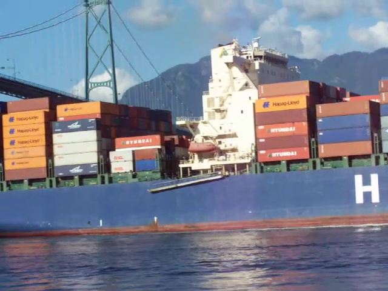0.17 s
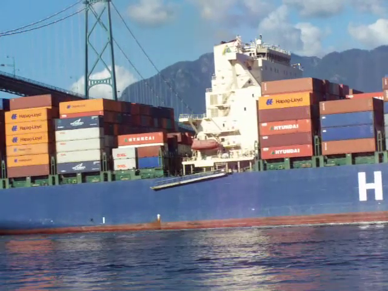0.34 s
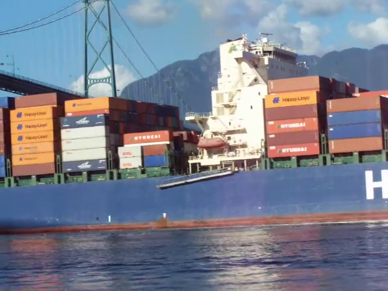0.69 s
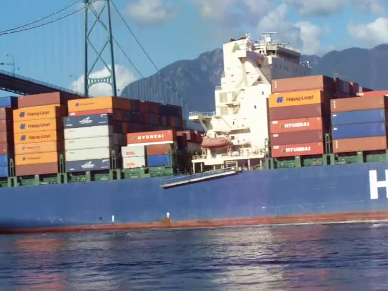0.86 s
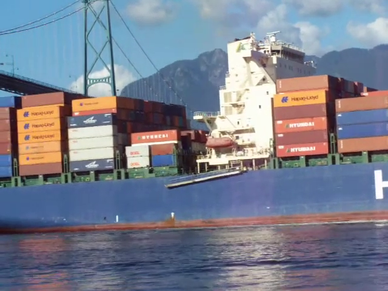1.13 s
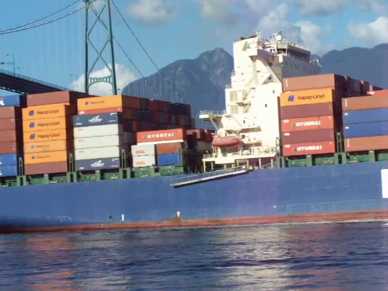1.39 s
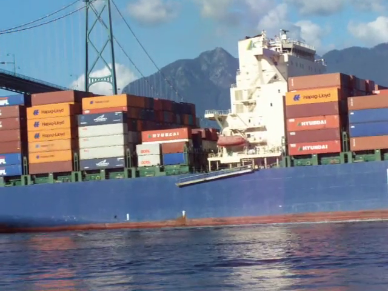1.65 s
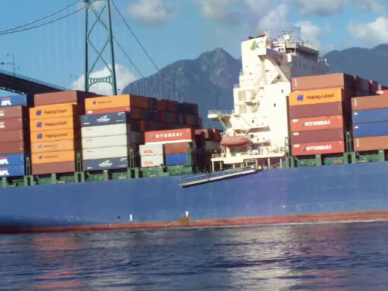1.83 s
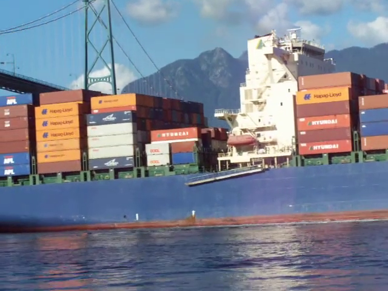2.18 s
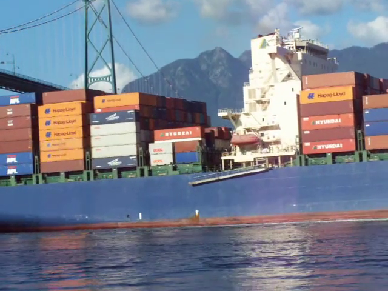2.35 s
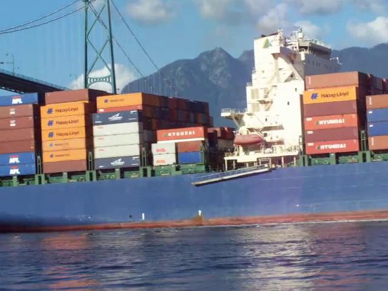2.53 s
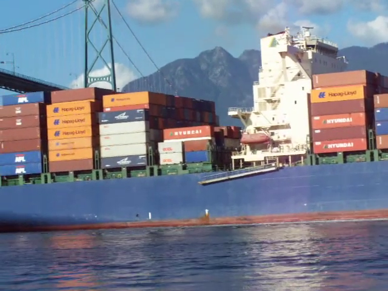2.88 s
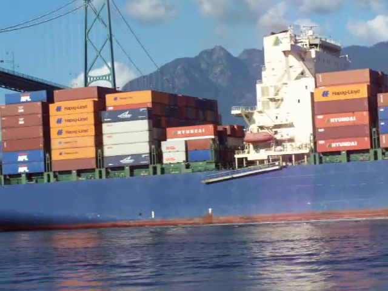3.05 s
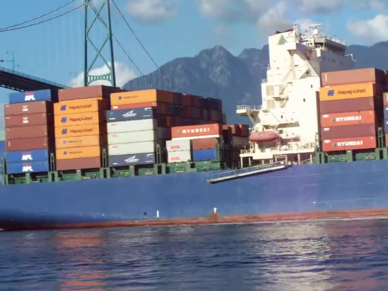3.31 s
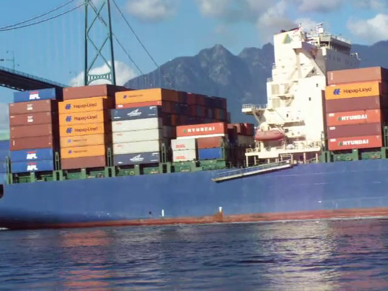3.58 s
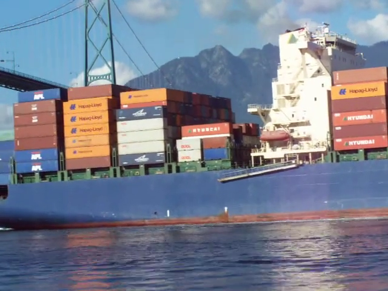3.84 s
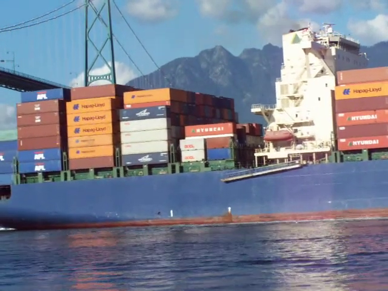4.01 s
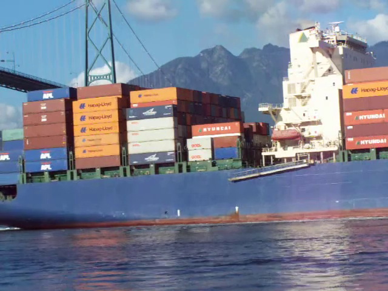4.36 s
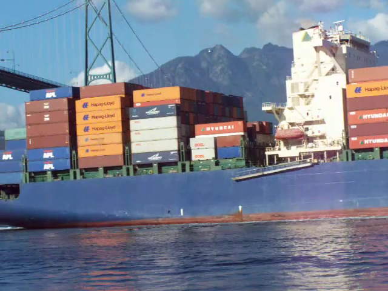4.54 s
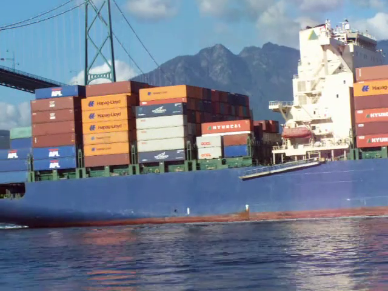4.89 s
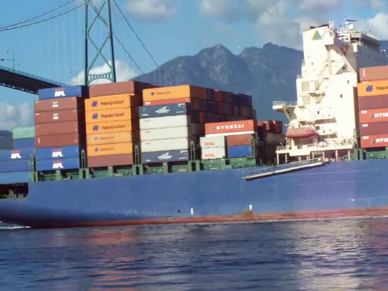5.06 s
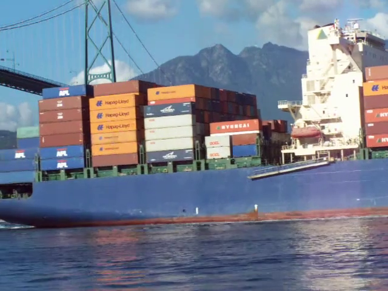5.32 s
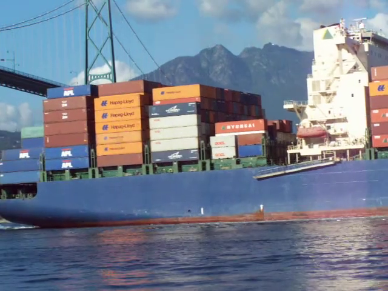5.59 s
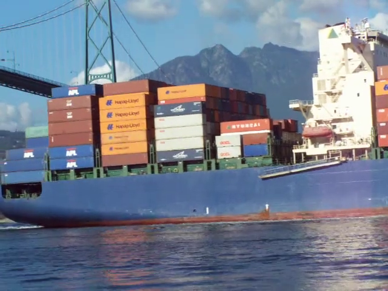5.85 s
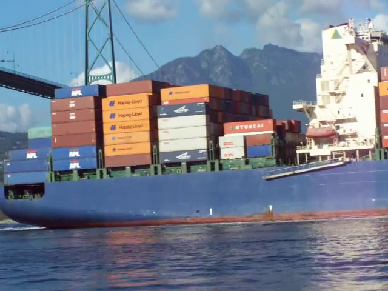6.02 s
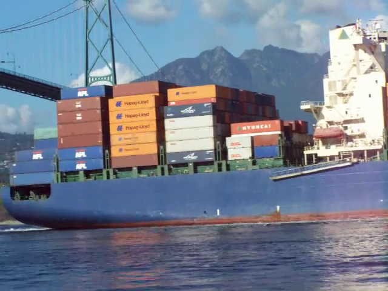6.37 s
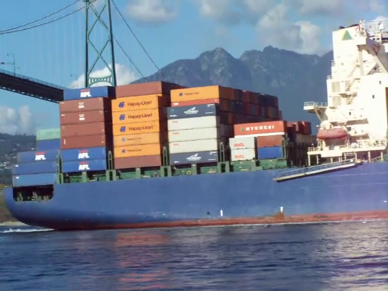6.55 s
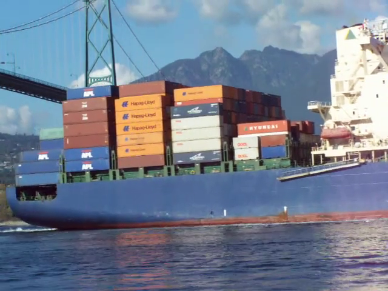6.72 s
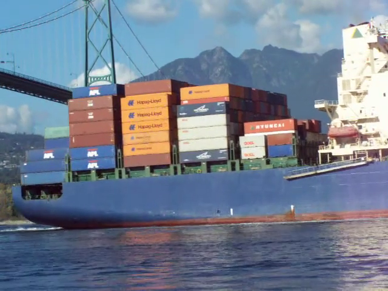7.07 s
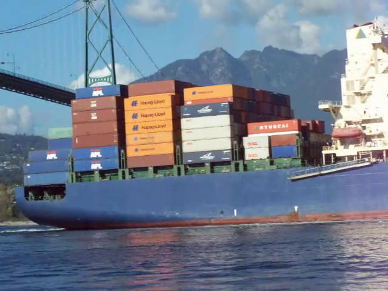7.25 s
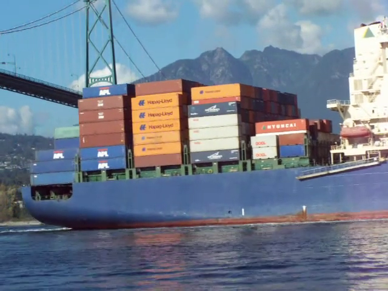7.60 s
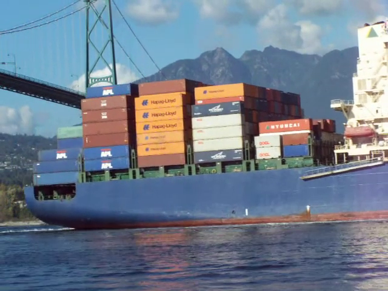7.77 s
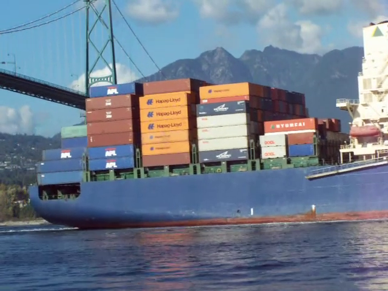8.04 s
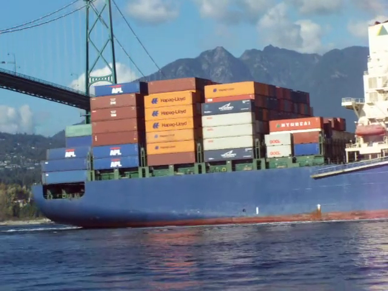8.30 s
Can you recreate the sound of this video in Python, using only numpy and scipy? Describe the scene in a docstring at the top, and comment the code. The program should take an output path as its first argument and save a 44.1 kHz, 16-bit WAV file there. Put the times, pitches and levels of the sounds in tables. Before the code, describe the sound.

Outdoors beside calm water, a large container ship passes a single microphone near the surface. Its engine gives a steady low drone and a soft throb of six puffs a second, stronger in the second half. Small waves lap and wash close by with fizz, fine spray and plopping bubbles. Behind lie a low distant roar and faint drifting hums, probably bridge traffic.

```python
"""On calm water, close to the surface, a large ship passes a single microphone.
The hull's far roar is shaped noise; drifting hums, probably bridge traffic, come and go as sines.
The wash swells and laps as noise bands in shared surges, among bubbles that ring as damped, rising sines.
The engine puffs six times a second: harmonic orders grouped in two stack resonances give drone and throb."""
import sys
import numpy as np
from scipy import signal
from scipy.fft import rfft, irfft, next_fast_len
from scipy.io import wavfile
from scipy.ndimage import uniform_filter1d, map_coordinates

SR = 44100
rng = np.random.default_rng(int(sys.argv[2]) if len(sys.argv) > 2 else 0)


def log_audio(samples):
    """Write samples as a 16-bit WAV file to the path given in sys.argv[1]."""
    # one column per channel
    frames = np.atleast_2d(samples).T
    # limit to full scale, then quantise
    limited = np.clip(frames, -1, 1)
    pcm = np.round(limited * 32767).astype(np.int16)
    wavfile.write(sys.argv[1], SR, pcm)


N = 370881  # samples


def amp(db):
    """Level and gain: 20 dB is a factor of ten in amplitude."""
    return 10 ** (np.asarray(db) / 20)


def unit(x):
    """Normalisation: the signal is scaled to rms 1."""
    return x / np.sqrt(np.mean(x ** 2) + 1e-20)


def curves(rows):
    """Linear interpolation in time: one value per sample for each column after t/s."""
    times, *columns = np.transpose(rows)
    t = np.arange(N) / SR
    return [np.interp(t, times, column) for column in columns]


def wobble(rate):
    """Band-limited randomness: a spline through random knots, rate knots a second."""
    knots = rng.standard_normal(int(N * rate / SR) + 4)
    return map_coordinates(knots, [np.arange(N) * rate / SR])


def spectral_gain(table):
    """Frequency response: level in dB interpolated over log frequency, given as gain."""
    f, db = np.transpose(table)
    return lambda hz: amp(np.interp(np.log(hz + 1), np.log(f + 1), db))


def filtered(x, response):
    """Linear filtering: the spectrum is multiplied by a real response of frequency."""
    padded = next_fast_len(N + SR // 2)
    spectrum = rfft(x, padded) * response(np.fft.rfftfreq(padded, 1 / SR))
    return irfft(spectrum, padded)[..., :N]


def rush(spectrum, patchy_db):
    """Turbulent noise: random gain patches in time and frequency, then a spectral envelope, at rms 1."""
    cells = signal.stft(rng.standard_normal(N), nperseg=512)[2]
    patches = uniform_filter1d(rng.standard_normal(cells.shape), size=5, axis=0)  # over frequency
    patches = uniform_filter1d(patches, size=16, axis=1)  # over time
    gain = amp(patchy_db * unit(patches))
    noise = signal.istft(cells * gain, nperseg=512)[1][:N]
    return unit(filtered(noise, spectral_gain(spectrum)))


def hull_roar():
    """Broadband radiation: the far roar of the hull is low noise with a slowly changing level."""
    # level of the far roar: t/s, level/dB
    hull_level = [(0, -31), (1.6, -32.5), (4, -31), (7.2, -32), (8.41, -30)]
    # its spectral density: f/Hz, level/dB (relative, per Hz)
    roar_spectrum = [(5, -14), (12, -8), (22, -12), (33, -7), (45, -4), (70, -4), (95, -3.5), (125, -1.5),
                     (150, 0), (185, -4), (260, -9), (330, -13), (500, -40), (900, -120)]
    return amp(curves(hull_level)[0]) * rush(roar_spectrum, patchy_db=1.44)


def hums():
    """Tonal hums, probably of traffic on a bridge: unsteady sines that drift in pitch and fade in and out."""
    # hums, probably bridge traffic: start t/s, length/s, f/Hz, drift/(Hz per s), level/dB
    hum_tones = [(0, 1.85, 218, 0.1, -40), (1.66, 2.63, 221.5, 0.3, -44), (2.5, 2.2, 199.3, -0.6, -47.5),
                 (6, 3, 198.8, 0.04, -41), (6.5, 2, 135.5, 3, -39.5), (6.5, 2.2, 234, 3.5, -43.5),
                 (3, 1.82, 297.3, .3, -41.5), (2.5, 3.2, 399.5, 0.04, -42), (4, 1.7, 420, -0.1, -43),
                 (7, 2, 421.5, 2, -39.5), (6.6, .9, 701, .5, -37.5)]
    fade_s = 0.49
    total, t = 0, np.arange(N) / SR
    for start, length, hz, drift, db in hum_tones:
        fade = np.clip(np.minimum(t - start, start + length - t) / fade_s, 0, 1)
        pitch = (hz + drift * (t - start)) * (1 + .0015 * wobble(6))
        tone = np.sin(2 * np.pi * (np.cumsum(pitch) / SR + rng.random()))
        # sqrt(2) brings the sine to rms 1
        total = total + np.sqrt(2) * amp(db + 2.1 * wobble(3)) * fade * tone
    return total


def bubbles(events):
    """Damped bubble resonance: each starts softly, rises in pitch and dies within some cycles."""
    out = np.zeros(N + SR)
    for start, db, hz, cycles, rise in events:
        length = min(round(2 * cycles / hz * SR), SR // 2)
        u = np.arange(length) / SR * hz / cycles  # time in lives
        shape = np.e * 4 * u * np.exp(-4 * u)  # peaks at 1 after a quarter life
        ring = np.sin(2 * np.pi * cycles * (u + rise * u * u / 2))
        out[round(start * SR):][:length] += amp(db) * shape * ring
    return out[:N]


def near_bubbles():
    """Single bubble resonances heard one by one near the microphone."""
    # bubbles: t/s, peak level/dB, start f/Hz, life/cycles, pitch rise over the life/share
    bubble_events = [(.06, -18.5, 616, 6.8, .2), (.222, -17.5, 248, 6.6, 2.6), (.389, -29, 4660, 45, .05),
                     (1.035, -30.5, 3850, 25, 0.091), (2.547, -22.5, 473, 9, 0.16),
                     (3.09, -21, 340, 7.5, 0.21), (3.733, -33, 2440, 27, .1), (4.491, -29, 1900, 9.9, .6),
                     (5.405, -26, 1440, 11, .1), (5.450, -25.5, 2600, 14, 0.59),
                     (5.522, -22, 337, 6.3, 0.26), (6.19, -24, 555, 9.8, 0.26),
                     (6.216, -31, 1460, 23, 0.58), (7.055, -21, 600, 8, 0.24), (7.382, -26, 626, 10, .3)]
    return bubbles(bubble_events)


def froth(lap_db, count):
    """Superposed bubble resonances at chance moments: the smaller, the higher and fainter."""
    moment, smallness, loud, life = rng.random((count, 4)).T
    start = moment * (N - 1) / SR
    hz = 300 * 16 ** smallness
    db = lap_db[(start * SR).astype(int)] - 6 - 15 * smallness + 7 * loud ** 2
    return bubbles(zip(start, db, hz, 7 + 12 * life, .2 + .5 * life))


def water():
    """Breaking waves as modulated noise bands: shared small surges act more sharply towards the spray."""
    # waves breaking nearby: t/s, wash level/dB, finest spray level/dB, fizz level/dB
    wave_levels = [(0.05, -32.5, -43, -39), (0.35, -33, -42.5, -40), (0.9, -33.5, -46, -38),
                   (1.28, -38, -49.5, -39), (1.41, -37.5, -49, -39), (1.85, -40.5, -46.5, -42),
                   (2.22, -38, -42.5, -42.5), (2.36, -38.5, -43.5, -40.5), (2.82, -34, -42, -40),
                   (3.17, -33, -44, -39), (3.47, -35, -46, -41), (4.56, -37, -49.5, -40),
                   (5.07, -37, -49, -40.5), (5.62, -33, -46, -39.5), (6.2, -33, -44, -37.5),
                   (6.89, -37, -49.5, -42), (7.49, -38.5, -50.5, -43), (7.82, -37.5, -49.5, -39.5),
                   (8.33, -38, -51, -41), (8.35, -38, -50.5, -40.5)]
    # followers: mean level/dB, share of the wash's swing, share of the finest spray's swing
    lap_follows = (-29.5, .3, .11)
    spray_follows = (-45, .45, .75)
    # spectral densities of the bands: f/Hz, level/dB (relative, per Hz)
    lap_spectrum = [(160, -39.5), (280, -4.5), (323, -3.5), (404, 0), (465, -1.5), (678, 0.5), (900, -11.5),
                    (1170, -34), (1980, -120)]
    wash_spectrum = [(530, -29.5), (900, -2), (1160, 0.5), (1350, -3), (1600, 0.5), (2000, -8),
                     (2600, -34.5), (4400, -120)]
    fizz_spectrum = [(1180, -26.5), (2000, -3.5), (2390, 1), (3700, -7), (4810, -37.5), (8140, -120)]
    spray_spectrum = [(2200, -120), (2900, -32), (3700, -5), (4100, -2.5), (4600, -0.5), (5200, -5),
                      (6500, -30), (9000, -120)]
    mist_spectrum = [(3000, -120), (4200, -31.5), (5200, -6), (5600, 1), (6300, -1), (7100, -1),
                     (9300, -9.5), (9600, -120)]  # the finest spray
    spray_lag_s = .12  # coarse drops fall after the fine ones

    wash_db, mist_db, fizz_db = curves(wave_levels)
    swings = np.array([np.ones(N), wash_db - wash_db.mean(), mist_db - mist_db.mean()])
    lap_db, spray_db = np.array([lap_follows, spray_follows]) @ swings
    spray_db = np.interp(np.arange(N) - spray_lag_s * SR, np.arange(N), spray_db)

    surge = wobble(14) + 0.76 * wobble(40)
    lapping = amp(lap_db + 0.15 * surge) * rush(lap_spectrum, patchy_db=0.54)
    wash = amp(wash_db + 0.18 * surge) * rush(wash_spectrum, patchy_db=0.9)
    fizz = amp(fizz_db + 0.23 * surge) * rush(fizz_spectrum, patchy_db=0.92)
    spray = amp(spray_db + 0.25 * surge) * rush(spray_spectrum, patchy_db=1.0)
    mist = amp(mist_db + 0.32 * surge) * rush(mist_spectrum, patchy_db=0.76)
    return lapping + wash + fizz + spray + mist + near_bubbles() + froth(lap_db, count=500)


def puffs(cycle, orders, centre, arrival, glide, drift_db):
    """Fourier series with dispersion: orders of the puff cycle, the higher ones arriving later."""
    total = 0
    for k, db in orders:
        away = k - centre
        # phase lag in cycles: its slope over order is the arrival, which grows by glide per order;
        # the constant is common to both resonances
        lag = arrival * away + glide * away ** 2 / 2 - .35
        level = amp(db + drift_db * wobble(1.7))
        total = total + level * np.cos(2 * np.pi * (k * cycle - lag))
    return unit(total)


def engine():
    """Resonance and Doppler shift: the lower resonance smears puffs into a drone, the upper one throbs."""
    # change of the sound path from the funnel: t/s, extra delay/ms
    path_delay = [(0, 5.3), (.8, 4.4), (2.3, -.2), (4.2, -2.9), (5.2, -1.3), (7.2, 0), (8.41, -.2)]
    # engine orders in the lower stack resonance: multiple of the cycle, level/dB (relative)
    low_orders = [(4, -28), (5, -19), (6, -7), (7, 0), (8, -5), (9, -16), (10, -11), (11, -16)]
    # the same in the upper one; the shaft turns once in five puffs and adds weak orders between
    high_orders = [(12, -4.5), (12.8, -18), (13, 0), (13.8, -23), (14, -4.5), (14.8, -17), (15, -.5),
                   (15.8, -21), (16, -15), (17, -17), (18, -22), (19, -12), (20, -24), (22, -20), (23, -20)]
    # the upper resonance swells as the funnel goes by: t/s, level/dB
    throb_level = [(0, -24), (2, -26.5), (3.7, -26), (5.6, -20.5), (7.2, -22), (8.41, -23)]
    cycle_hz, drone_db = 6.025, -27  # puff rate at the source; the drone holds its level

    emitted_s = np.arange(N) / SR - curves(path_delay)[0] / 1000
    cycle = cycle_hz * emitted_s
    drone = puffs(cycle, low_orders, centre=7, arrival=.603, glide=.337, drift_db=.9)
    throb = puffs(cycle, high_orders, centre=13.5, arrival=.111, glide=.085, drift_db=1.1)
    return amp(drone_db) * drone + amp(curves(throb_level)[0]) * throb


def scene():
    """Superposition: all sources add in one channel."""
    return (hull_roar() + hums() + water() + engine())[None]


def record(dry):
    """Band limitation: the treble rolls off and nothing remains from the top frequency up."""
    # treble roll-off: f/Hz, level/dB
    roll_off = [(7100, 0.5), (7700, -2.5), (8300, -9.5), (8750, -18), (8950, -32.5), (9150, -46)]
    top_hz = 9180
    treble_gain = spectral_gain(roll_off)
    return filtered(dry, lambda hz: treble_gain(hz) * (hz < top_hz))


dry = scene()
out = record(dry)
log_audio(out)
```